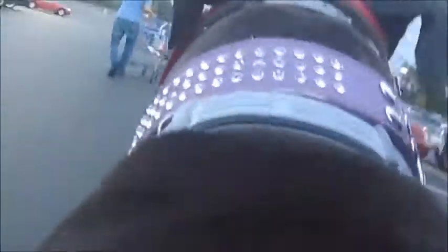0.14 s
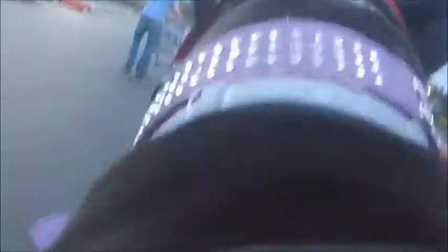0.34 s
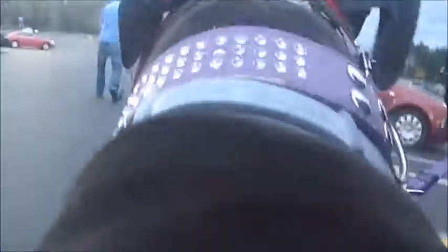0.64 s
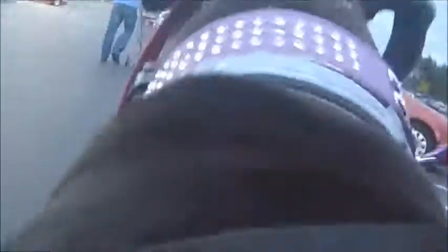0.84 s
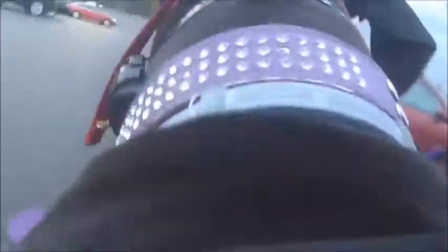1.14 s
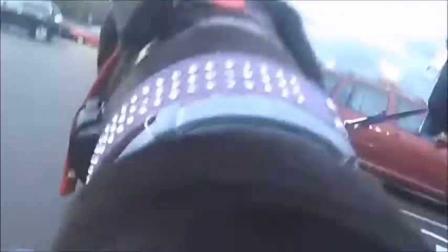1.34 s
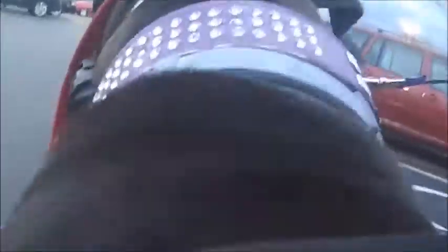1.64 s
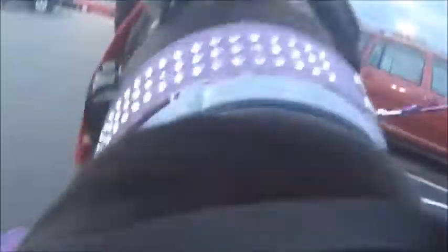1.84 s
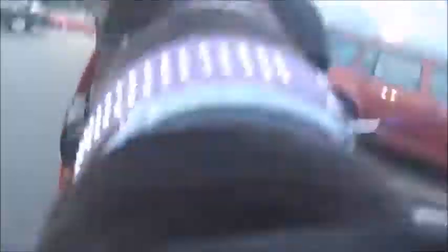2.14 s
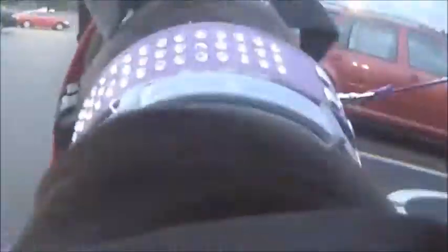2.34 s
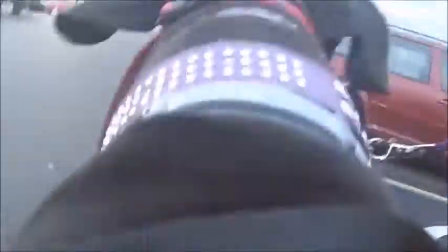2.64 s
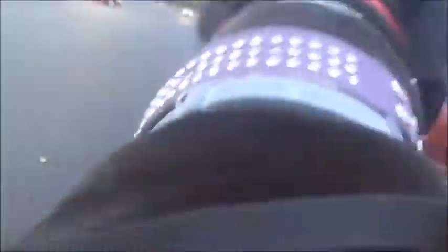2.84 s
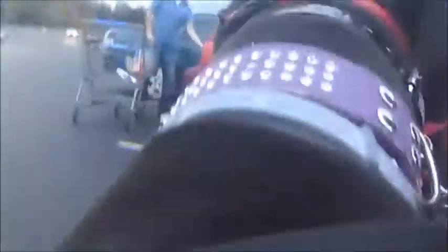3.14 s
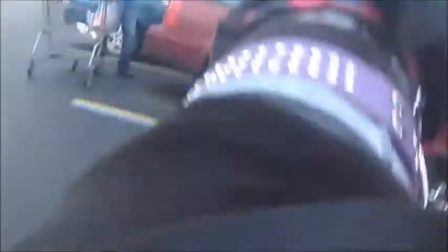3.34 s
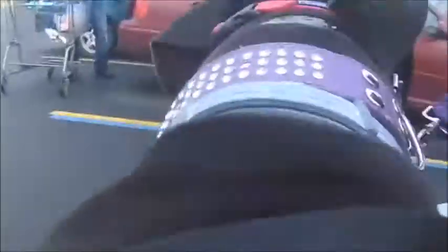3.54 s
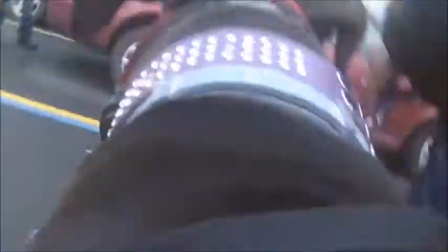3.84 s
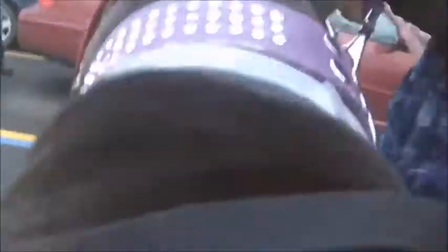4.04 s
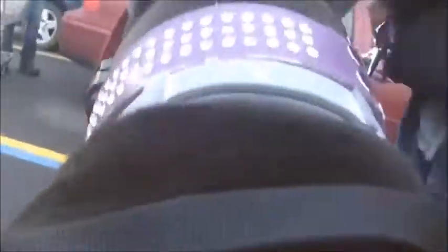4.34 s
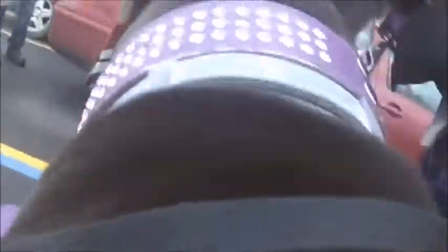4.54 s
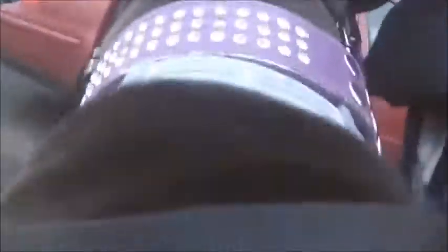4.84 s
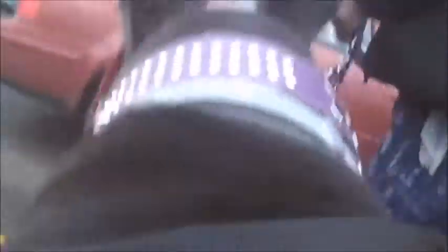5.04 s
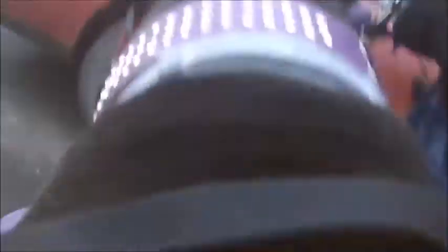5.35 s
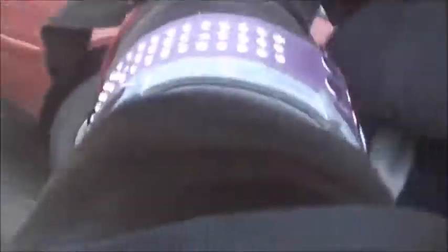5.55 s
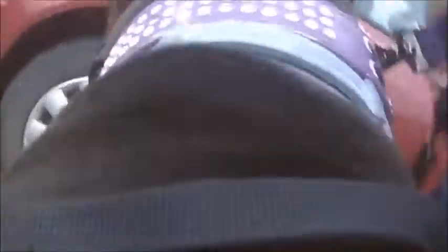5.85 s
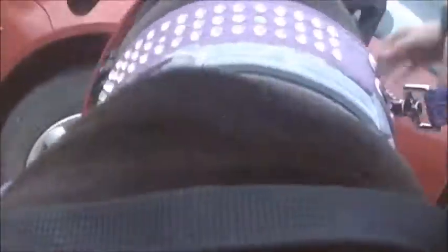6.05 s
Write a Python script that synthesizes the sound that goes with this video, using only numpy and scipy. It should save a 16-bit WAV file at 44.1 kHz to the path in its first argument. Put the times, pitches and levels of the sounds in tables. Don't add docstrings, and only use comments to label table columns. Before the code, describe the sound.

Close, scratchy to-and-fro harness rubbing with plastic clicks and buckle ticks, a sharp knock at each end, over muffled open air and hiss.

```python
import sys
import numpy as np
from scipy import signal
from scipy.fft import rfft, irfft
from scipy.io import wavfile

SR = 44100
rng = np.random.default_rng(int(sys.argv[2]) if len(sys.argv) > 2 else 0)


def level_to_linear(level):
    exponent = np.asarray(level, float) / 20
    return 10 ** exponent


def file_out(sig):
    cols = np.atleast_2d(sig).T
    lim = np.clip(cols, -1, 1)
    pcm = np.round(lim * 32767).astype(np.int16)
    wavfile.write(sys.argv[1], SR, pcm)


N = 273772


def rms_one(x):
    return x / np.sqrt(np.mean(x ** 2) + 1e-20)


def drift(rate_hz):
    r = np.exp(-2 * np.pi * rate_hz / SR)
    wander = signal.lfilter([1], [1, -2 * r, r * r], rng.standard_normal(N + SR))
    return rms_one(wander[SR:])


def coloured(spectrum):
    hz, db = np.transpose(spectrum)
    log_hz = np.log(np.arange(N // 2 + 1) * SR / N + 1)
    gain = level_to_linear(np.interp(log_hz, np.log(hz), db))
    return rms_one(irfft(rfft(rng.standard_normal(N)) * gain, N))


def ring(clicks, hz, t60):
    r, w = level_to_linear(-60 / (t60 * SR)), 2 * np.pi * hz / SR
    return signal.lfilter([0, np.sin(w)], [1, -2 * r * np.cos(w), r * r], clicks + 1e-18)


def clicks_at(times, sizes):
    out = np.zeros(N)
    out[np.round(np.asarray(times) * SR).astype(int)] = sizes
    return out


def grains(per_s, spread_db):
    size_db = spread_db * np.minimum(rng.exponential(1, N), 5)
    sizes = level_to_linear(size_db) * rng.choice([-1, 1], N)
    return rms_one(sizes * (rng.random(N) < per_s / SR))


def slides_db(rows, rest_db):
    attack_s, release_s, swell_db = 0.035, 0.023, 3.5
    t, power = np.arange(N) / SR, np.full(N, level_to_linear(2 * rest_db))
    for s, length_s, db in rows:
        span = slice(int(s * SR), int((s + length_s + release_s) * SR))
        age = t[span] - s
        fade_in = np.clip(age / attack_s, 0, 1)
        fade_out = np.clip((length_s - age) / release_s + 1, 0, 1)
        swell = level_to_linear(db + swell_db * np.minimum(age / length_s - 1, 0))
        power[span] += (fade_in * fade_out * swell) ** 2
    return 10 * np.log10(power)


# (start [s], length [s], level at the end [dB])
SLIDES = [(0, 0.03, -32.5), (0.292, 0.069, -45.0), (0.481, 0.091, -42.5), (0.691, 0.038, -42.5),
          (0.846, 0.074, -45), (1.025, 0.115, -46.0), (1.24, 0.087, -46.5), (1.459, 0.12, -50.5),
          (1.679, 0.065, -46), (1.866, 0.14, -47), (2.095, 0.091, -42.5), (2.302, 0.065, -46),
          (2.517, 0.085, -45.5), (2.704, 0.13, -49.5), (2.916, 0.078, -45.0), (3.108, 0.073, -43.5),
          (3.225, 0.15, -44.5), (3.522, 0.102, -50.5), (3.804, 0.1, -46.5), (4.001, 0.041, -50.5),
          (4.158, 0.064, -48.5), (4.345, 0.13, -46.5), (4.565, 0.082, -44.5), (4.767, 0.071, -52.0),
          (4.929, 0.13, -48), (5.188, 0.063, -47.5), (5.373, 0.097, -45.5), (5.647, 0.051, -48.0),
          (5.802, 0.082, -46.5), (6.08, 0.038, -63),
          (0.053, 0.24, -46.5), (0.368, 0.1, -42.0), (0.583, 0.095, -48), (0.753, 0.059, -42),
               (0.93, 0.077, -45.5), (1.14, 0.076, -47), (1.352, 0.093, -49.5), (1.604, 0.03, -47.5),
               (1.765, 0.081, -47.5), (2.026, 0.044, -36.5), (2.186, 0.1, -45.0), (2.393, 0.096, -50.0),
               (2.615, 0.08, -46), (2.824, 0.076, -47.5), (3.025, 0.071, -43.0), (3.2, 0.041, -38),
               (3.409, 0.071, -42.0), (3.617, 0.15, -48.0), (3.917, 0.07, -49.0), (4.056, 0.1, -48.5),
               (4.234, 0.069, -50.0), (4.474, 0.053, -43), (4.67, 0.067, -46.5), (4.85, 0.083, -44.0),
               (5.096, 0.055, -43.5), (5.258, 0.11, -43.0), (5.494, 0.13, -47.0), (5.715, 0.044, -48.5),
               (6.019, 0.022, -49), (6.17, 0.05, -46)]


def gait_db():
    return slides_db(SLIDES, rest_db=-61.5)


# (frequency [Hz], t60 [s], level when rubbed [dB], level when ticked [dB])
CASE_MODES = [(990, 0.0049, -35, -22), (1230, 0.02, -1, 3), (1350, 0.0083, -1, -1), (1508, 0.02, -1, 3.5),
              (1674, 0.017, -1.5, 4.5), (1930, 0.015, -6, -2), (1995, 0.013, -14.5, -26),
              (2250, 0.018, -12, -10.5), (2797, 0.029, -14, -22), (3150, 0.0098, -12, -8),
              (3640, 0.012, -22, -17.5), (4044, 0.023, -14, -13.5), (4590, 0.028, -23, -22.5),
              (5140, 0.016, -23, -19.5), (6550, 0.012, -20, -23.5), (7380, 0.0055, -18, -20),
              (8500, 0.0034, -31.5, -42)]


def rubbed_modes(modes, slips):
    out = np.zeros(N)
    for k, (hz, t60, rubbed_db, _) in enumerate(modes):
        out += (-1) ** (k // 3) * level_to_linear(rubbed_db) * ring(slips[k % 3], hz, t60)
    return out


def rubbing(level_db):
    clumps_db = 1.4 * drift(63)
    slips = [grains(3000, spread_db=3.5) for patch in range(3)]
    low, high = rubbed_modes(CASE_MODES[:7], slips), rubbed_modes(CASE_MODES[7:], slips)
    lag_db = 0.15 * (level_db - level_db.mean())
    patchy_db = 1.5 * drift(14.6)
    upper = level_to_linear(-2 - lag_db + patchy_db)
    rub = level_to_linear(level_db + clumps_db) / np.std(low) * (low + upper * high)
    return signal.lfilter(*signal.iirnotch(2560, 7, fs=SR), rub)


# (start [s], length [s], level at the end [dB])
LURCHES = [(.045, 0.028, -45.5), (.235, 0.033, -45.5), (.77, 0.029, -57), (.88, .04, -57),
           (1.07, 0.067, -56.5), (1.71, .035, -64), (1.87, 0.078, -52), (2.48, 0.027, -55),
           (2.535, .065, -52), (3.21, 0.095, -60), (3.3, .16, -57.5), (4.61, 0.027, -53),
           (5.01, 0.045, -57), (5.12, 0.067, -61), (5.83, 0.055, -54)]
# (frequency [Hz], level [dB], t60 [s])
MOUNT_MODES = [(335, 4.5, 0.0087), (506, 2, 0.019), (675, 2, 0.015), (857, -2, 0.024)]


def dragging(rub_db):
    slips = grains(1500, spread_db=4.5)
    hollow = sum((-1) ** k * level_to_linear(db) * ring(slips, hz, t60) for k, (hz, db, t60) in enumerate(MOUNT_MODES))
    under_slides = level_to_linear(-64 + 0.46 * (rub_db - rub_db.mean()))
    lurches = level_to_linear(slides_db(LURCHES, rest_db=-92))
    return np.hypot(under_slides, lurches) * rms_one(hollow)


def ticks(rows, tilt_db):
    s, peak_db = np.transpose(rows)
    chance = rng.standard_normal((len(s), len(CASE_MODES), 2))
    out = np.zeros(N)
    for k, (hz, t60, _, ticked_db) in enumerate(CASE_MODES):
        reached = s + .0006 * np.abs(chance[:, k, 1])
        strength_db = peak_db + ticked_db + tilt_db * np.log2(hz / 1500) - 10.5 + 0.96 * chance[:, k, 0]
        out += ring(clicks_at(reached, (-1) ** k * level_to_linear(strength_db)), hz, 0.98 * t60)
    return signal.sosfilt(signal.butter(4, 780, "high", fs=SR, output="sos"), out)


# (time [s], peak level [dB])
BUCKLE_TICKS = [(0.2783, -24.5), (0.4143, -28), (0.4396, -33), (0.471, -28.5), (0.551, -30.5),
                (0.6397, -35.5), (0.6697, -27), (0.79, -31), (1.4986, -37), (1.8427, -34), (2.1478, -27),
                (2.159, -30), (2.2866, -35), (3.0852, -40), (3.4729, -30.5), (3.5793, -34.5),
                (3.6226, -30.5), (3.7282, -36), (4.164, -39), (4.4118, -34), (4.4453, -29), (4.522, -30.5),
                (4.6374, -34), (5.036, -35), (5.153, -33.5), (5.3284, -31.5), (5.3644, -34), (5.7338, -36),
                (5.878, -15)]


def buckle_ticks():
    return ticks(BUCKLE_TICKS, tilt_db=4)


# (time [s], peak level [dB])
STRAP_TICKS = [(0.0125, -29), (0.0692, -30.5), (0.3516, -34), (0.5378, -30), (0.7762, -37), (1.1309, -24.5),
               (1.3082, -30.5), (1.6158, -33), (2.0452, -38), (2.0626, -36), (2.072, -33), (2.2723, -28),
               (2.3622, -29), (2.507, -34.5), (2.82, -34), (3.0535, -49), (3.217, -29.5), (3.2435, -29),
               (3.8741, -28.5), (4.092, -34), (4.211, -34), (4.9255, -16), (5.166, -25.5), (5.3426, -33),
               (5.56, -38), (5.5716, -24), (5.839, -31), (5.8625, -27), (5.898, -27), (6.2024, -33)]


def strap_ticks():
    return ticks(STRAP_TICKS, tilt_db=-4)


# (time [s], peak level [dB])
SNAPS = [
    (2.6677, -25),
    (4.4968, -26),
]


def snaps():
    s, peak_db = np.transpose(SNAPS)
    hit = clicks_at(s, level_to_linear(peak_db))
    modes = [(1640, -12, 0.0075), (3430, -8.0, 0.0048), (3900, -10.5, 0.0029),
             (7000, -22, .003), (10500, -20, .002)]
    return sum(level_to_linear(db) * ring(hit, hz, t60) for hz, db, t60 in modes)


def knock(s, level_db, modes, rebound_s, rebound_db, damped_s):
    hit = clicks_at([s, s + rebound_s], level_to_linear([level_db, level_db + rebound_db]))
    stifle = np.exp(-((np.arange(N) / SR - s) / damped_s) ** 2)
    return stifle * sum((-1) ** k * level_to_linear(db) * ring(hit, hz, t60) for k, (hz, db, t60) in enumerate(modes))


# (frequency [Hz], level [dB], t60 [s])
KNOCK_FIRST = (0.0245, -11.5, [(360, -11, 0.026), (650, -12.5, 0.015), (1220, 0, 0.049),
               (1500, 7.5, 0.0069), (1646, 4.5, 0.034), (2030, -4.5, 0.075), (2390, -7.5, 0.026),
               (2980, -9.5, 0.013), (3270, -3.5, 0.023), (3650, -5.5, .012), (4090, -6.5, 0.04),
               (4360, -20, 0.011), (4580, -9, 0.027), (5170, -9.5, 0.0085), (6100, -26, 0.016),
               (7070, -17.5, 0.01), (7700, -17, .012), (9900, -27, 0.01), (11200, -19, .005)])


def first_knock():
    return knock(*KNOCK_FIRST, rebound_s=0.00066, rebound_db=-21.0, damped_s=.009)


# (frequency [Hz], level [dB], t60 [s])
KNOCK_LAST = (5.9048, -11.5, [(242, -2, 0.015), (550, -4.5, 0.02), (1180, 9, 0.0077), (1560, 8.5, 0.011),
              (2034, 2.5, 0.049), (2340, 0, 0.075), (2600, -6, 0.032), (3270, 8.5, 0.012),
              (3560, -6.5, 0.036), (3870, 0.5, 0.01), (4610, -0.5, 0.029), (4680, -1.5, 0.013),
              (5450, -13, 0.015), (6430, -34, .008), (7300, -18, 0.0107), (7600, -18, 0.017),
              (8600, -35, 0.008), (9550, -25, 0.0079), (13200, -16, .004)])


def last_knock():
    return knock(*KNOCK_LAST, rebound_s=0.0024, rebound_db=-14.5, damped_s=0.0078)


# (frequency [Hz], level [dB], t60 [s])
HANDLE_MODES = [(275, -45, .5), (557, -54, .4)]


def leash_handle():
    hit = clicks_at([KNOCK_LAST[0]], 0.92)
    return sum(level_to_linear(db) * ring(hit, hz, t60) for hz, db, t60 in HANDLE_MODES)


# (frequency [Hz], level [dB], t60 [s])
ZIP_MODES = [(3550, -16, .01), (4000, 8, 0.017), (4260, 6, 0.018), (5240, 3, 0.013)]


def leash_cord():
    start_s, length_s, level_db, fade_db_per_s = 5.932, 0.031, -49.5, 260.0
    t = np.arange(N) / SR
    slips = grains(5000, spread_db=3.0)
    zip_noise = rms_one(sum(level_to_linear(db) * ring(slips, hz, t60) for hz, db, t60 in ZIP_MODES))
    fading_db = fade_db_per_s * np.maximum(t - start_s - length_s, 0)
    onset = np.clip((t - start_s) / 0.0076, 0, 1)
    return onset * level_to_linear(level_db - fading_db) * zip_noise


def pushes(rows, hz, cycles):
    t = np.arange(int(cycles / hz * SR)) / SR
    hump = np.sin(np.pi * t * hz / cycles) ** 2
    s, peak_db = np.transpose(rows)
    return signal.fftconvolve(clicks_at(s, level_to_linear(peak_db)), hump * np.sin(2 * np.pi * hz * t))[:N]


# (time [s], peak level [dB])
PAW_THUMPS = [(0.051, -39), (0.251, -42), (0.451, -41), (0.953, -39), (1.163, -39.5), (1.614, -40),
              (1.729, -43), (2.501, -39), (3.651, -40), (4.014, -37), (4.174, -35)]


def paw_thumps():
    return pushes(PAW_THUMPS, 182, cycles=1.6)


# (time [s], peak level [dB])
BODY_JOLTS = [(0.681, -40.5), (1.102, -46), (1.519, -49.5), (1.954, -45), (2.259, -44), (2.549, -53),
              (3.185, -41.5), (3.574, -40.5), (3.867, -36), (4.714, -43.5), (4.841, -45), (5.276, -46),
              (5.379, -45)]


def body_jolts():
    return pushes(BODY_JOLTS, 32.8, cycles=1.65)


# (frequency [Hz], level [dB per Hz])
AIR_SPECTRUM = [(8, -18), (14, 7), (30, 3.5), (60, 0.5), (200, -2.5), (580, -11.5), (950, -16.5),
                (1180, -8), (1750, -11.5), (2100, -19), (2600, -25), (5000, -43)]


def open_air():
    gusts_db = 1.3 * drift(9)
    return level_to_linear(-54 + gusts_db) * coloured(AIR_SPECTRUM)


# (frequency [Hz], level [dB per Hz])
HISS_SPECTRUM = [(300, -10), (2000, -4), (4000, -1.5), (8000, -5), (12000, -6), (15500, -6.5)]


def amplifier_hiss():
    top_edge = signal.cheby2(16, 50, 16050, fs=SR, output="sos")
    return level_to_linear(-61.5) * signal.sosfilt(top_edge, coloured(HISS_SPECTRUM))


# (frequency [Hz], rms level [dB])
TONES = [
    (60, -64),
    (13750, -90),
]


def hum_and_whine():
    t = np.arange(N) / SR
    return sum(level_to_linear(db + 3 + 2 * drift(4)) * np.sin(2 * np.pi * hz * t) for hz, db in TONES)


def scene():
    rub_db = gait_db()
    contact = rubbing(rub_db) + dragging(rub_db) + buckle_ticks() + strap_ticks() + snaps()
    blows = first_knock() + last_knock() + leash_handle() + leash_cord()
    body = paw_thumps() + body_jolts()
    background = open_air() + amplifier_hiss() + hum_and_whine()
    return (contact + blows + body + background)[None]


# (time [s], length fully lost [ms], lost above [Hz], share of bands kept there [0-1])
DROPOUTS = [(0.107, 4, 4500, .05), (0.288, 20, 2600, .75), (0.855, 0, 3000, .3), (1.002, 2, 4000, .3),
            (1.708, 1, 3000, .4), (1.945, 1, 3000, .4), (2.562, 0, 4500, .6), (2.709, 1, 4500, .5),
            (3.264, 2, 2500, .4), (3.414, 1, 4000, .4), (3.605, 0, 3000, .6), (3.775, 1, 4000, .3),
            (4.476, 0, 5000, .05), (5.249, 0, 2500, .5), (5.31, 2, 5500, .05), (5.53, 0, 3500, .6),
            (5.75, 20, 2400, .45)]


def treble_dropouts(x):
    fade_ms = 17
    out, hz = x.copy(), np.arange(2049) * SR / 4096
    luck = rng.random((len(DROPOUTS), 129))
    for (s, ms, edge_hz, kept), draw in zip(DROPOUTS, luck):
        block = slice(round(s * SR) - 2048, round(s * SR) + 2048)
        away_ms = np.abs(np.arange(-2048, 2048)) / SR * 1000 - ms / 2
        window = np.cos(np.pi / 2 * np.clip(away_ms / fade_ms, 0, 1)) ** 2
        band_luck = draw[np.arange(2049) // 16]
        lost = (hz > edge_hz) & (band_luck * hz > kept * edge_hz)
        out[:, block] -= .99 * window * irfft(rfft(x[:, block]) * lost)
    return out


def low_pass(x):
    return signal.sosfilt(signal.butter(12, 16520, fs=SR, output="sos"), x)


def record(dry):
    rounded = .9 * np.tanh(dry / .9)
    mix = treble_dropouts(rounded)
    return low_pass(mix)


dry = scene()
out = record(dry)
file_out(out)
```